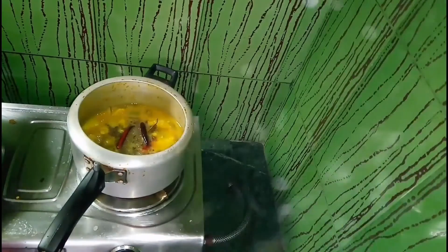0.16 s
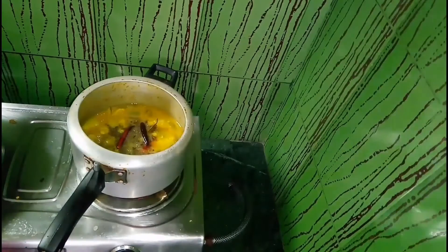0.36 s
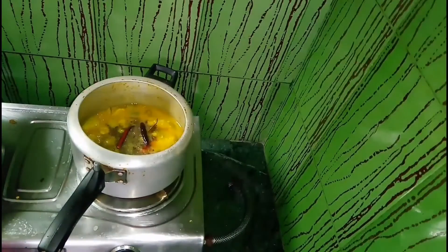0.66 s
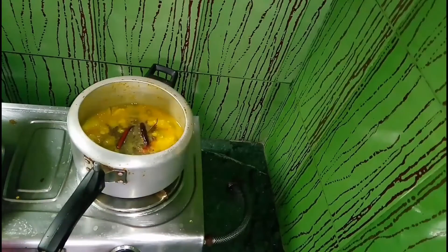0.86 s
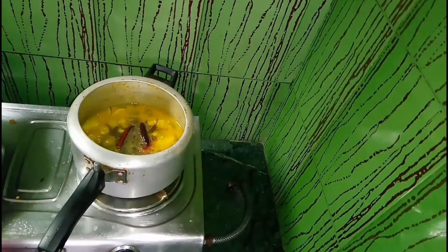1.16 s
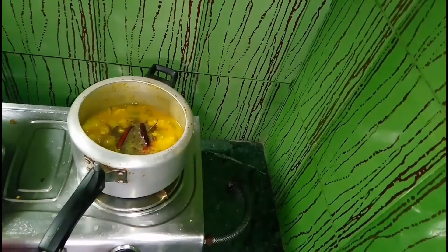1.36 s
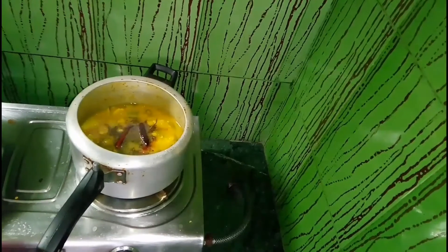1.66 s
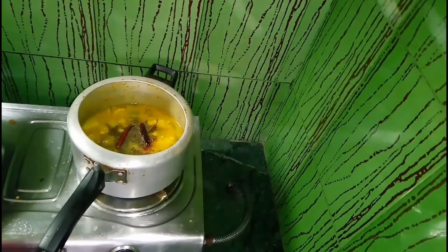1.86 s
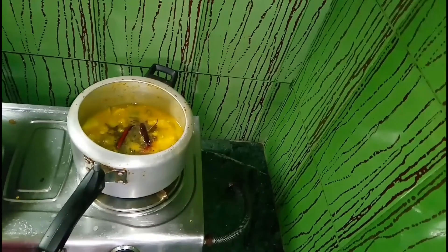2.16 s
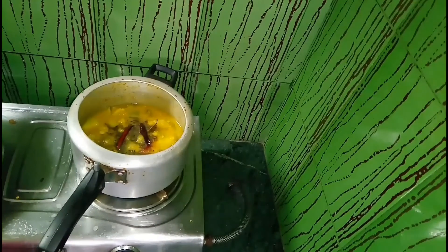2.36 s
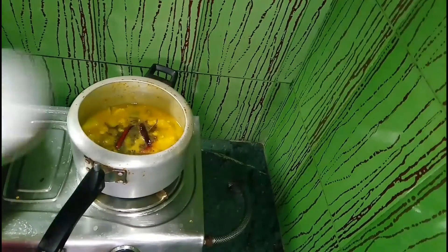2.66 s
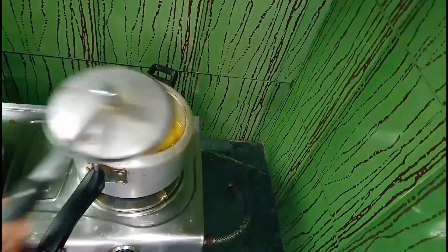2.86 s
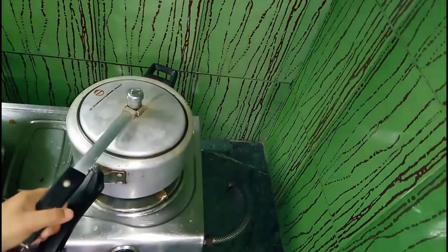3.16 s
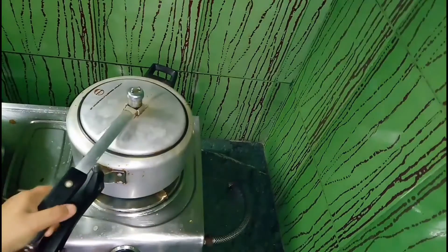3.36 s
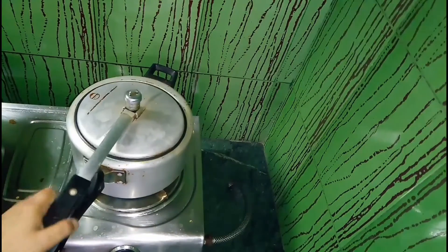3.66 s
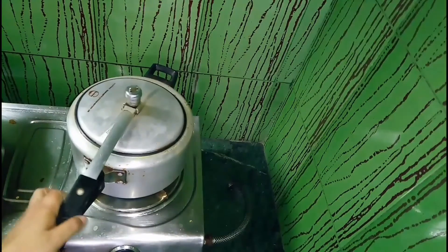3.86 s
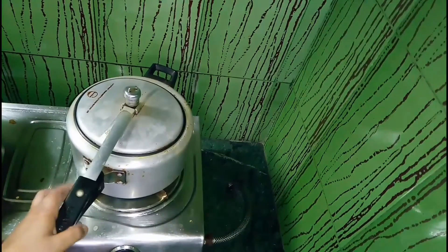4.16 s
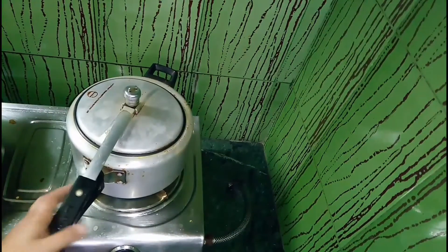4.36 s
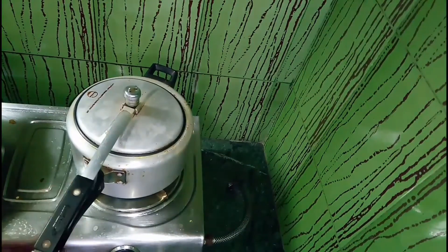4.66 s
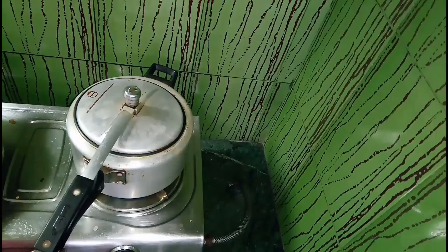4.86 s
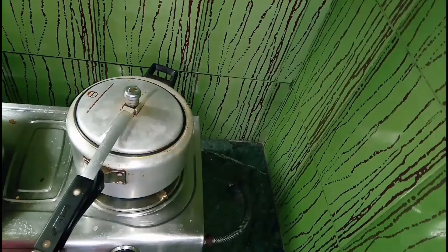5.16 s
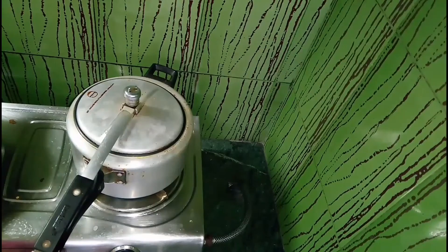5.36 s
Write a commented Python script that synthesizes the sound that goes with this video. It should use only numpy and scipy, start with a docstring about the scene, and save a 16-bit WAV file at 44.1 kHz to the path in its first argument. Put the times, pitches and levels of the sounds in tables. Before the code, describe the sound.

Hot oil sizzles fiercely and fades, an empty pan clatters on a steel stove, then a metal lid clangs onto a pot and latches.

```python
"""Hot spiced oil sizzles and spits on a pot of simmering lentils in a small tiled kitchen. The empty pan
clatters down on the steel stove, then the cooker's lid is fetched, dropped on the rim and latched.
Oil, simmer and rumble are shaped noise; metal is short bursts of noise ringing resonant modes in a room.
A phone listens through two ports whose bass comes out in opposite polarity."""
import sys
import numpy as np
from scipy import signal
from scipy.fft import rfft, irfft, next_fast_len
from scipy.io import wavfile
from scipy.ndimage import uniform_filter1d, map_coordinates

SR = 44100
rng = np.random.default_rng(int(sys.argv[2]) if len(sys.argv) > 2 else 0)


def transcribe(signal):
    """Save signal, clipped to [-1, 1], as a 16-bit WAV file at the path in sys.argv[1]."""
    frames = np.atleast_2d(signal).T
    limited = np.clip(frames, -1, 1)
    pcm = np.round(limited * 32767).astype(np.int16)
    wavfile.write(sys.argv[1], SR, pcm)


N = 243431

# relative colour of an oil droplet's spit: frequency_hz, density_db (per Hz)
SPIT_COLOUR = [(1500, -34.5), (3500, -21.5), (6000, -5), (8500, -1.5), (10800, 11.5), (12500, -18.5),
               (15300, -26.5)]


def amp(db):
    """Decibels to linear gain."""
    return 10 ** (np.asarray(db) / 20)


def unit(x):
    """Scale to an rms of 1."""
    return x / np.sqrt(np.mean(x ** 2) + 1e-20)


def along(points, hz):
    """Read (Hz, value) points on a log frequency axis."""
    f, v = np.transpose(points)
    return np.interp(np.log(hz + 1), np.log(f + 1), v)


def curve(rows):
    """Join (s, value) points by straight lines, one value per sample."""
    s, v = np.transpose(rows)
    return np.interp(np.arange(N) / SR, s, v)


def wobble(rate):
    """A smooth random curve with rate knots a second."""
    knots = rng.standard_normal(int(N * rate / SR) + 4)
    return map_coordinates(knots, [np.arange(N) * rate / SR])


def coloured(x, points):
    """Filter x through a (Hz, dB) spectrum."""
    n = x.shape[-1]
    m = next_fast_len(n + 8192)
    gain = amp(along(points, np.fft.rfftfreq(m, 1 / SR)))
    return irfft(rfft(x, m) * gain, m)[..., :n]


def rush(spectrum, patchy_db):
    """Two unrelated noises (port sum, port difference) of joint rms 1, sharing patches of random gain."""
    z = signal.stft(rng.standard_normal((2, N)), nperseg=512)[2]
    patches = uniform_filter1d(rng.standard_normal(z.shape[1:]), size=6, axis=0)  # across frequency
    patches = uniform_filter1d(patches, size=10, axis=1)  # across time
    noise = signal.istft(z * amp(patchy_db * unit(patches)), nperseg=512)[1][:, :N]
    return unit(coloured(noise, spectrum))


def echoes(length):
    """A fresh kitchen tail for port sum and difference; each frequency dies at its own speed."""
    # how long the tiled room rings: frequency_hz, t60_s
    kitchen = [(100, 0.64), (500, 0.64), (2500, 0.6), (6000, 0.55), (12000, 0.38)]
    hz, t, z = signal.stft(rng.standard_normal((2, length)), SR, nperseg=256)
    decay = amp(-60 * t / along(kitchen, hz)[:, None])
    tail = signal.istft(z * decay, SR, nperseg=256)[1][:, :length]
    return tail / np.linalg.norm(tail[0])


def room_tone():
    """A steady hiss and hum: noise in a fixed colour, drifting very slightly in level."""
    # relative colour of the quiet kitchen: frequency_hz, density_db (per Hz)
    tone_colour = [(15, -53.5), (50, -12.5), (75, -7), (101, -5.5), (140, -18), (177, -2.5), (215, -13.5),
                   (280, -17), (442, -18.5), (563, -26.5), (640, -7), (756, -29), (1800, -19.5),
                   (8400, -22), (9100, -12.5), (10500, -6), (12000, -16.5), (15300, -41)]
    return amp(-57.5 + 0.3 * wobble(11.0)) * rush(tone_colour, patchy_db=2.0)


def simmer():
    """The pot and burner simmer low: patchy noise centred on the bubbling resonances."""
    # loudness of pot and burner: start_s, level_db
    simmer_level = [(0, -65), (.25, -67.5), (.32, -58), (1.6, -65.5), (2, -62.5), (3.25, -58.5), (3.9, -65),
                    (4.1, -62.5), (4.3, -78.5), (5.52, -73.5)]
    # relative colour of the bubbling: frequency_hz, density_db (per Hz)
    bubbling = [(120, -31.5), (200, -11), (222, -18), (373, 4), (436, 3), (470, -6), (649, 6), (771, -7),
                (1200, -16.5), (1560, -34.5), (2640, -120)]
    return amp(curve(simmer_level) + 0.46 * wobble(13)) * rush(bubbling, patchy_db=-2.5)


def rumble():
    """A low rumble swells while the lid is handled: bass noise under a level curve."""
    # loudness of the swell: start_s, level_db
    swell = [(2.5, -85), (2.75, -85), (2.948, -66), (3.262, -64.5), (4.2, -74)]
    # relative colour of the rumble: frequency_hz, density_db (per Hz)
    rumble_colour = [(35, -41), (60, 0.5), (85, -2), (130, -40), (300, -120)]
    fade_s, silent_db = 0.2, -110
    level_db = curve([(swell[0][0] - fade_s, silent_db), *swell, (swell[-1][0] + fade_s, silent_db)])
    return amp(level_db) * rush(rumble_colour, patchy_db=1.5)


def metal_push(t, chatter_s):
    """What stirs the metal: a noisy crack, an uneven chatter and one sharp blow."""
    crack = amp(-12.0 - 60 * t / 0.019)
    chatter = amp(-60 * t / max(chatter_s, .005))
    push = rng.standard_normal((2, len(t))) * (crack + chatter)
    touches_db = 3.3 * rng.standard_normal(len(t) // 64 + 1)  # a new force every 64 samples
    push *= amp(touches_db.repeat(64)[:len(t)])
    push[:, 0] += amp(17)  # the blow itself, which always sets the modes going
    return push


def clatter(hits, modes, wet_db, thud_db, treble_db=0, soft_hz=SR):
    """Each contact stirs the modes and fills the kitchen; thud follows body, treble follows clang."""
    # relative colour of the dense clatter: frequency_hz, level_db (per Hz)
    crash = [(25, -12), (100, -3), (450, -1.5), (1200, 1.5), (3000, -6), (7000, -0.5), (10800, 4.5),
             (12500, -1), (15300, -28.5)]
    # treble, clang, body and thud bands: low_hz, high_hz
    bands_hz = [(4500, 15000), (1800, 4500), (550, 1800), (25, 550)]
    t = np.arange(SR * 2 // 3) / SR
    out = np.zeros((2, N + SR))
    m = next_fast_len(2 * len(t))
    f = np.fft.rfftfreq(m, 1 / SR)
    bands = []
    for edges in bands_hz:
        sos = signal.butter(3, edges, "bandpass", fs=SR, output="sos")
        bands.append(signal.sosfreqz(sos, f, fs=SR)[1])
    body = 1 + sum(amp(db) * 1j * f * w / (c * c - f * f + 1j * f * w) for c, w, db in modes)
    padding = 1 / (1 + 1j * f / soft_hz) ** 3  # a padded contact loses its top
    for s, *clang_db, body_db, chatter_s in hits:
        levels_db = [body_db + thud_db, body_db]
        for db in clang_db:
            levels_db += [db, db + treble_db]
        push = metal_push(t, chatter_s)
        tail = np.pad(echoes(len(t)), ((0, 0), (200, 0)))  # echoes start 200 samples late
        room = 1 + amp(wet_db) * rfft(tail, m)
        sound = rfft(push, m) * amp(along(crash, f)) * body * room * padding
        # thud upwards; hits with no clang level reach the lower two bands only
        for band, db in zip(bands[::-1], levels_db):
            part = irfft(sound * band, m)[:, :len(t)]
            peak = np.abs(part).max(axis=1, keepdims=True)
            out[:, round(s * SR):][:, :len(t)] += amp(db) * part / peak
    return out[:, :N]


def stove_thumps():
    """Dull thumps through the stove top: padded blows on one low mode."""
    # thumps: start_s, body_peak_db, chatter_t60_s
    thumps = [(1.70, -57, 0.05), (4.14, -55.5, 0.048), (4.44, -63.5, 0.082)]
    # stove top modes: pitch_hz, width_hz, level_db (over the crash)
    stove = [(183, 31, 15)]
    return clatter(thumps, stove, wet_db=-4, thud_db=11.5, soft_hz=500)


def handle():
    """Soft knocks on the handle: padded blows on its low modes."""
    # knocks: start_s, body_peak_db, chatter_t60_s
    soft_knocks = [(4.02, -40, 0.23), (4.055, -39.5, 0.47)]
    # handle modes: pitch_hz, width_hz, level_db (over the crash)
    handle_modes = [(177, 19, 4.5), (312, 32, 17), (672, 14, 5)]
    return clatter(soft_knocks, handle_modes, wet_db=-5.5, thud_db=-5.0, soft_hz=724)


def latch():
    """The latch snaps over: two close contacts on small, bright metal modes."""
    # snaps: start_s, clang_peak_db, body_peak_db, chatter_t60_s
    latch_hits = [(4.097, -26, -55, 0.11), (4.109, -28.5, -37.5, 0.16)]
    # latch modes: pitch_hz, width_hz, level_db (over the crash)
    latch_modes = [(2480, 61, 10), (3140, 152, 12.5), (4670, 118, 9.5), (8500, 92, 0.5), (10690, 130, 12.5),
                   (11570, 70, 19.5)]
    return clatter(latch_hits, latch_modes, wet_db=-9.0, treble_db=12, thud_db=-2.5)


def lid_drag():
    """The lid is dragged off the counter: rapid contacts with long chatter on the counter's modes."""
    # scrapes: start_s, clang_peak_db, body_peak_db, chatter_t60_s
    drag = [(2.1538, -36, -49, 0.5), (2.1758, -26, -38, 0.64), (2.1941, -24, -44.5, 0.75),
            (2.2094, -27.5, -36, 0.36), (2.2431, -29, -28, 0.087), (2.2616, -24.5, -42, 0.087)]
    # counter modes: pitch_hz, width_hz, level_db (over the crash)
    counter = [(106, 19, 14), (326, 120, -12), (670, 160, 12.5), (1373, 27, 12), (3780, 650, 4),
               (5320, 1100, 2.5)]
    return clatter(drag, counter, wet_db=-7.0, treble_db=5, thud_db=-2.0)


def lid_taps():
    """The lid taps the rim, before and after it drops: light contacts on broad, damped modes."""
    # taps: start_s, clang_peak_db, body_peak_db, chatter_t60_s
    taps = [(2.4514, -21.5, -31.5, 0.087), (2.891, -49, -55.5, 0.92), (3.011, -44, -39, 0.19),
            (3.029, -23.5, -49, 0.042), (3.217, -35, -52, 0.11), (3.98, -49, -65, 0.2),
            (4.775, -48, -51.5, 0.24)]
    # lid modes: pitch_hz, width_hz, level_db (over the crash)
    lid_modes = [(1095, 27, 15.5), (2027, 175, 17), (2270, 20, 21), (2356, 110, 24), (2810, 82, 24),
                 (4490, 150, 10.5), (5550, 84.5, 1)]
    return clatter(taps, lid_modes, wet_db=-7.0, treble_db=3, thud_db=-23)


def lid_drop():
    """The lid drops onto the pot and bounces: blows that ring the closed pot's narrow low modes."""
    # bounces: start_s, clang_peak_db, body_peak_db, chatter_t60_s
    bounces = [(3.301, -15, -21.5, 0.066), (3.308, -4.5, -12.5, 0.014), (3.329, -17.5, -26, 0.015),
               (3.351, -8, -31, 0.052), (3.3714, -14, -28, 0.011), (3.399, -19, -23, 0.06)]
    # closed pot modes: pitch_hz, width_hz, level_db (over the crash)
    shut_pot = [(98, 1.7, 15), (173, 2.25, 22), (196.2, 3, 18), (300.6, 13, 11.5), (870, 160, 6.5),
                (1108, 21.3, 19), (1762, 42, 10), (2327, 180, 5.5), (3320, 37, -19), (8170, 80, -4.5),
                (10400, 320, -3), (11760, 580, 0.5)]
    return clatter(bounces, shut_pot, wet_db=1.5, treble_db=8.5, thud_db=-7.5)


def pan_knocks():
    """The pan knocks the pot: short blows on the open pot's modes."""
    # knocks: start_s, body_peak_db, chatter_t60_s
    knocks = [(.335, -17, .04), (.739, -16, .03), (.831, -13, .03), (.92, -20, .06)]
    # open pot modes: pitch_hz, width_hz, level_db (over the crash)
    pot = [(661, 9.3, 32.5), (660, 12, 18.5), (965, 33, 8.5), (1494, 200, -1.5)]
    return clatter(knocks, pot, wet_db=-3.0, thud_db=-26)


def pan_clatter():
    """The empty pan clatters down on the stove: a run of contacts on its ringing modes."""
    # contacts: start_s, clang_peak_db, body_peak_db, chatter_t60_s
    pan_hits = [(0.7377, -13.5, -12.5, 0.089), (0.7894, -18.5, -13.5, 0.25), (0.8889, -12, -27, 0.24),
                (0.9114, -14.5, -15.5, 0.13), (0.9541, -8.5, -14, 0.13), (0.9741, -11.5, -36, 0.039),
                (0.9994, -16, -22, 0.013), (1.0444, -26, -29.5, 0.035)]
    # pan modes: pitch_hz, width_hz, level_db (over the crash)
    pan_modes = [(698, 40, 8.5), (867, 21, 9), (1024, 34, 3.5), (1174, 36, 1.5), (1374, 17, 10.5),
                 (2343, 4.2, 19.5), (2395, 11, 13.5), (2930, 34, 2), (3120, 14, 19), (3120, 30, 10.5),
                 (3287, 1100, -1), (3446, 13, 20.5), (3450, 25, 4), (10970, 71, 11)]
    return clatter(pan_hits, pan_modes, wet_db=2.5, treble_db=7, thud_db=-17.5)


def oil_level():
    """Gain of the sizzle: a falling curve with brief swells and a dip, silent shortly after the lid drops."""
    # loudness of the sizzle: start_s, level_db
    sizzle = [(0, -25.5), (.08, -34), (.3, -31.5), (.6, -35.5), (1.36, -41), (1.8, -48.5), (2.5, -50),
              (3.28, -55.5)]
    # brief flares (a negative rise is a dip): peak_s, rise_db (over the sizzle), length_s
    flares = [(0.355, 7, 0.04), (0.454, 10.5, 0.21), (1.672, 2.5, 0.16), (1.805, 4.5, 0.087),
              (1.924, 4, .18), (3.057, 2.5, 0.14), (3.174, -3, .13)]
    rise_share = 0.8  # share of a flare's length spent rising
    silent_s, silent_db = 3.7, -88
    level_db = curve(sizzle)
    for s, db, length_s in flares:
        level_db += curve([(s - rise_share * length_s, 0), (s, db), (s + (1 - rise_share) * length_s, 0)])
    level_db = np.where(np.arange(N) < silent_s * SR, level_db, silent_db)
    return amp(uniform_filter1d(level_db, size=300))


def oil_hiss():
    """Steam bubbles bursting too densely to tell apart: coloured noise with an unsteady level."""
    # relative colour of the fizz: frequency_hz, density_db (per Hz)
    fizz = [(530, -58.5), (900, -24), (1850, -17), (2040, -24.5), (2240, -10), (2680, -13.5), (3090, -4),
            (3480, -9.5), (4730, -6), (7250, -5), (10800, 3.5), (15300, -21)]
    return amp(-2.5 + 2.3 * wobble(28)) * rush(fizz, patchy_db=1)


def oil_spatter():
    """A rain of small spatters: random bursts of noise, about 90 a second, of uneven strength."""
    strike = rng.random(N) < 90 / SR
    bursts = strike * amp(2.6 * rng.exponential(size=N).clip(0, 3))
    power = np.abs(signal.lfilter([1], [1, -.992], bursts ** 2))  # each fades in some milliseconds
    noise = np.sqrt(power) * rng.standard_normal((2, N))
    return amp(-9.5) * unit(coloured(noise, SPIT_COLOUR))


def oil_spits():
    """Single loud spits: coloured noise with a quick rise, a sharp decay and a faint longer tail."""
    # spits: start_s, peak_db
    spits = [(0.0968, -15), (.1478, -22), (.2424, -27.5), (.5264, -27), (0.631, -21), (0.652, -19),
             (0.6837, -19), (1.286, -29.5), (1.3793, -27), (1.3944, -27.5), (1.423, -26), (1.453, -26.5),
             (1.479, -30.5), (1.5556, -25.5), (1.5776, -25.5), (1.6568, -30.5), (1.701, -31),
             (1.772, -27.5), (1.786, -28.5), (1.8064, -26), (1.822, -29), (1.8576, -29.5), (1.957, -29.5),
             (2.0204, -33), (2.1334, -31.5), (2.3177, -23), (2.657, -32), (2.7737, -30), (2.832, -37),
             (3.011, -30.5), (3.111, -41), (3.1607, -31), (3.883, -39), (5.1955, -37.5)]
    t = np.arange(SR // 8) / SR
    out = np.zeros((2, N + SR))
    decay_t60_s, tail_t60_s, rise_s = 0.018, 0.54, 0.0011
    decay = amp(-60 * t / decay_t60_s) + amp(-22 - 60 * t / tail_t60_s)
    shape = decay * (1 - np.exp(-t / rise_s))
    for s, db in spits:
        burst = coloured(rng.standard_normal((2, len(t))), SPIT_COLOUR) * shape
        out[:, round(s * SR):][:, :len(t)] += amp(db) * burst / np.abs(burst).max()
    return out[:, :N]


def oil():
    """Hot oil: hiss and spatter share one level curve, single spits keep their own levels."""
    return oil_level() * (oil_hiss() + oil_spatter()) + oil_spits()


def scene():
    """Mix every layer as port sum and port difference."""
    background = room_tone() + simmer() + rumble()
    small_knocks = stove_thumps() + handle() + latch()
    lid = lid_drag() + lid_taps() + lid_drop()
    pan = pan_knocks() + pan_clatter()
    return background + small_knocks + lid + pan + oil()


def record(dry):
    """The ports differ most in the bass; the right one is a little louder; the top is cut off."""
    # spread between the ports: frequency_hz, level_db (difference over sum)
    width = [(30, 3), (60, 11), (110, 12), (200, 8), (380, 8), (690, 6), (1280, 0), (2370, -1), (14800, 0)]
    # balance of the ports: frequency_hz, level_db (left over right)
    lean = [(60, -1.0), (110, -2.0), (200, -4.5), (380, -1.5), (690, -2.5), (1280, -1.5), (2370, -0.5),
            (4360, -0.5), (8050, -0.5), (14800, -8.0)]
    top_hz = 15450
    mid, side = dry[0], coloured(dry[1], width)
    half = np.array(lean) * [1, .5]  # each port takes half the imbalance
    left = coloured(mid + side, half)
    right = coloured(mid - side, half * [1, -1])
    pair = np.array([left, right]).clip(-1, 1)
    m = next_fast_len(N + 8192)
    kept = np.fft.rfftfreq(m, 1 / SR) < top_hz
    return irfft(rfft(pair, m) * kept, m)[:, :N]


dry = scene()
out = record(dry)
transcribe(out)
```